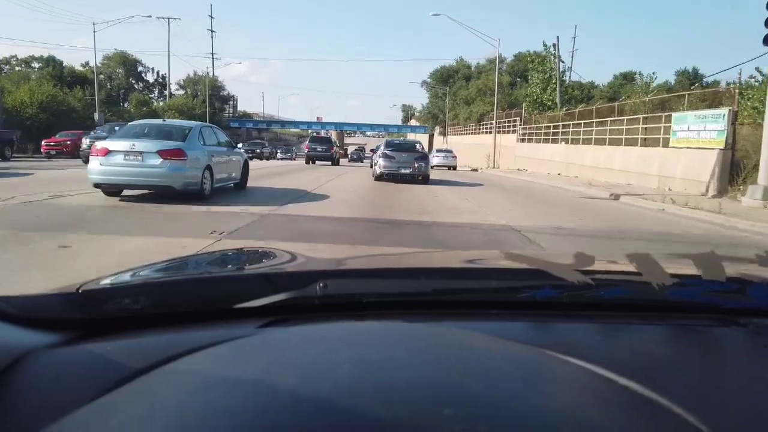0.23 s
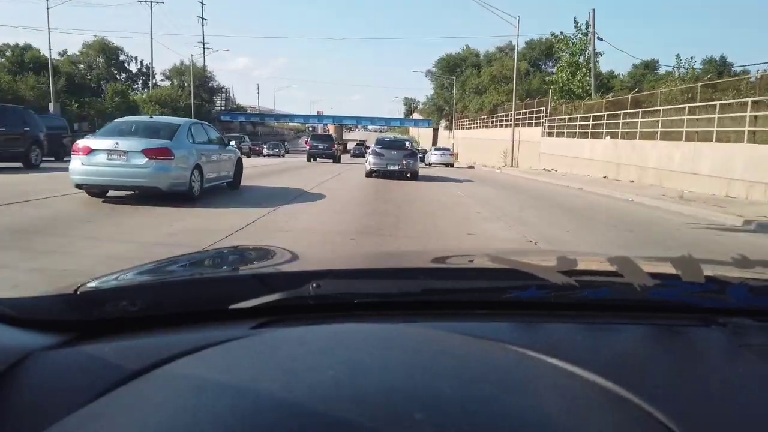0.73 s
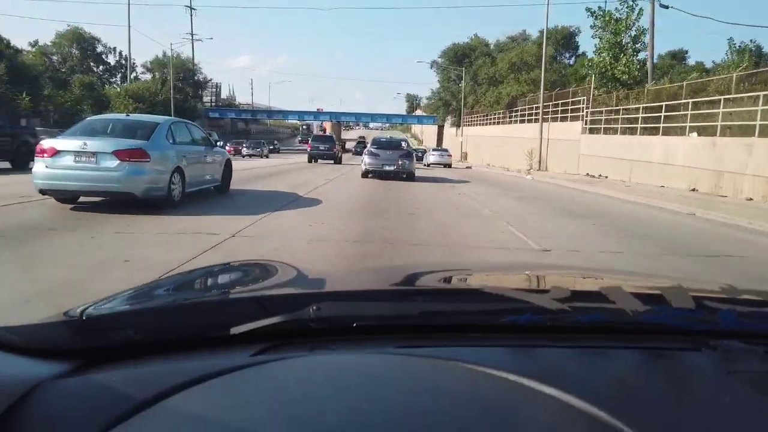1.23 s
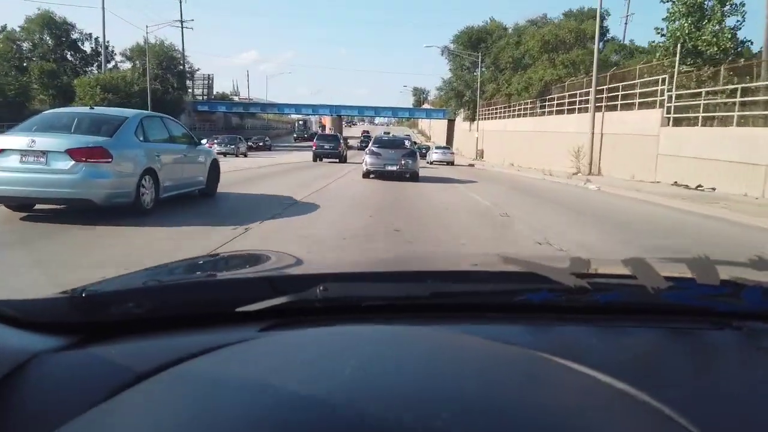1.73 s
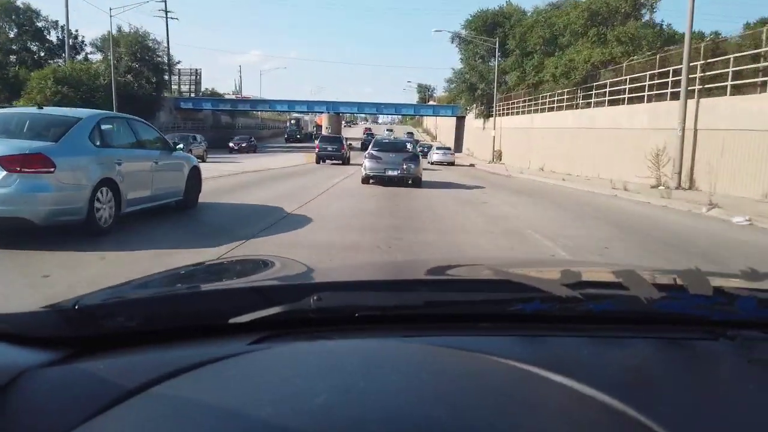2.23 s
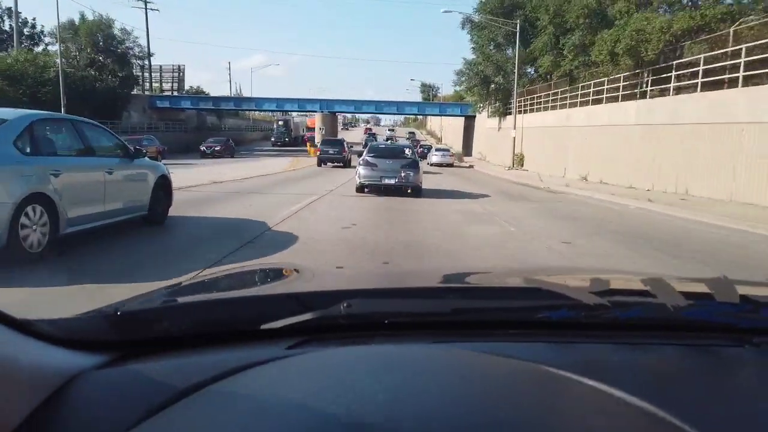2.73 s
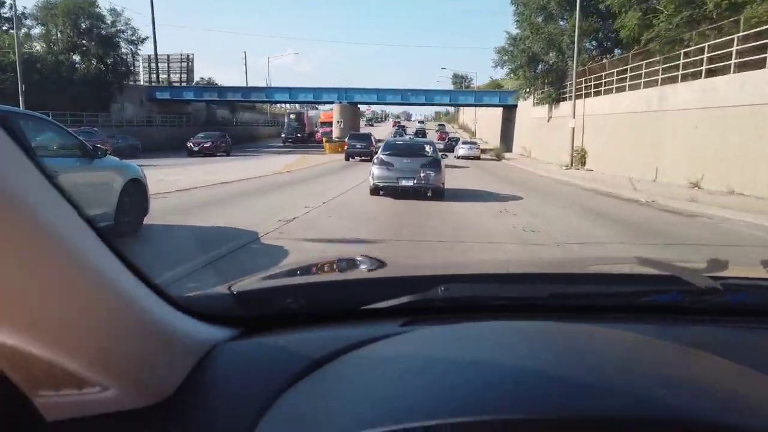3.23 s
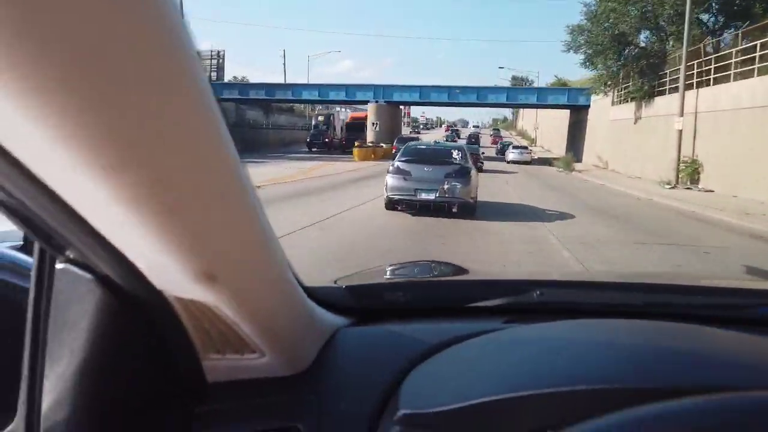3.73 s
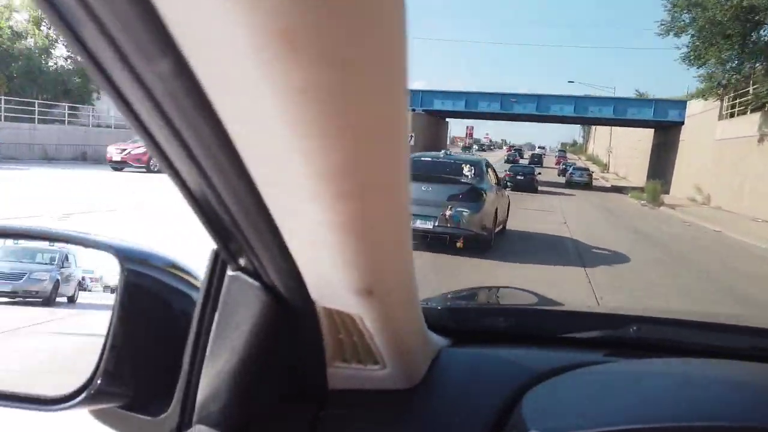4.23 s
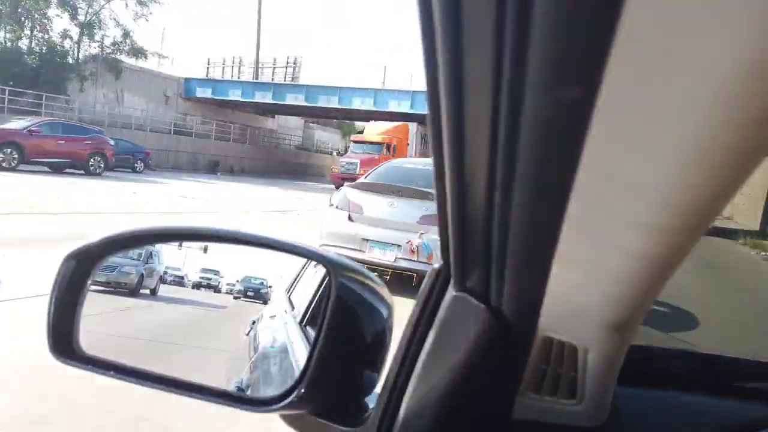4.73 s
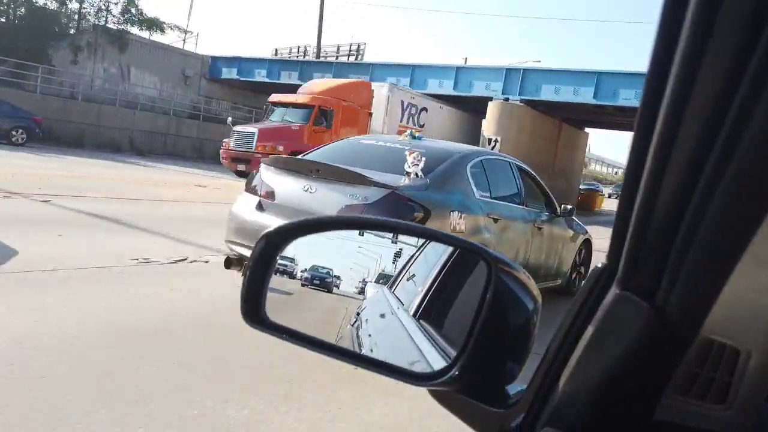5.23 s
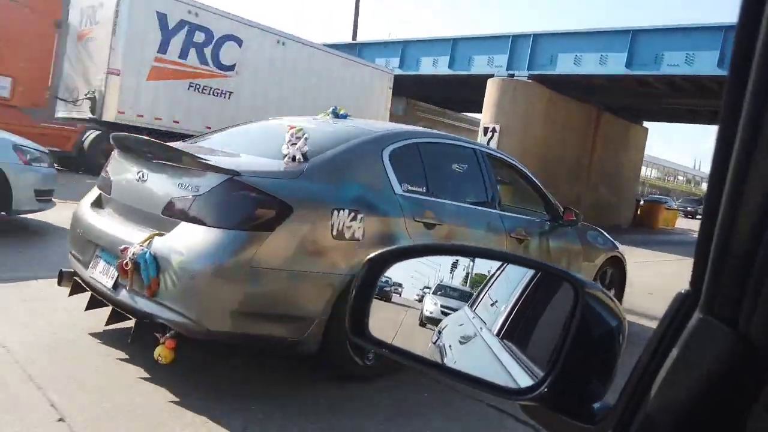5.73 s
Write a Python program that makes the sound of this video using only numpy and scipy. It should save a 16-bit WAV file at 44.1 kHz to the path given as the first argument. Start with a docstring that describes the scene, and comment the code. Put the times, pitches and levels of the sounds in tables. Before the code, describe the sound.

The sound is heard inside a car moving along a concrete highway with a window open. Low rumble, tyre roar and rushing air run throughout, with dull thumps from road joints until about 4 seconds. The car's deep exhaust drone rises slightly in pitch until 1.5 seconds, sinks away, then swells again from 2.8 to 3.5 seconds. Short plastic trim knocks come at about 2.4, 3.9 and 4.7 seconds, the last the loudest. Two faint, high squeals around 4.2 seconds lead into a thin whistle that climbs to the end as window hiss grows. From about 4.3 seconds a second, louder car draws alongside. Its exhaust dips at 5 seconds, then revs up with a rasp from 5.2 to 5.6, with a brief gust of air. It stutters around 5.7 seconds and begins to fall in pitch, still loud.

```python
"""V6 exhaust drone inside a car on a concrete highway, window open: firing harmonics, two throttle pulls.
A second, louder V6 comes alongside, revs once, stutters on one bank and falls back.
Under them: body rumble and boom, jolts at the road joints, tyre roar, rushing air and window hiss.
Plastic trim knocks a few times; two brief squeals lead into a thin rising whistle."""
import sys
import numpy as np
from scipy import signal
from scipy.fft import rfft, irfft
from scipy.io import wavfile
from scipy.ndimage import uniform_filter1d

SR = 44100
rng = np.random.default_rng(int(sys.argv[2]) if len(sys.argv) > 2 else 0)


def bounce(signal):
    """Save signal as a 16-bit WAV file at the path given by the first command-line argument."""
    frames = np.transpose(np.atleast_2d(signal))
    limited = np.clip(frames, -1, 1)
    pcm = np.round(limited * 32767).astype(np.int16)
    wavfile.write(sys.argv[1], SR, pcm)


N = 264600
STEP = 8  # engines have no treble: coarse grid
TIME_S = np.arange(N) / SR
COARSE_S = TIME_S[::STEP]
CYLINDERS = 6
PEDAL_S, RELEASE_S = .06, .09  # own throttle: attack, release

# own engine speed (time [s], firing rate [Hz])
OWN_FIRING_HZ = [(0, 128.1), (.12, 133.8), (.3, 134.7), (.5, 143), (1.42, 150.2), (1.5, 145.5), (1.6, 135),
                 (2.2, 130.9), (2.8, 98), (3.15, 132.4), (3.3, 140.4), (3.49, 142.7), (3.8, 113.5),
                 (6, 105.5)]
# own throttle pulls (down [s], up [s], drone [dB], load [0-1], intake hiss [dB])
THROTTLE_PULLS = [(-.35, 1.482, -13, .95, -61.5), (2.8, 3.544, -14.5, 0.7, -61)]
# own exhaust through the cabin (frequency [Hz], gain [dB])
CABIN_DB = [(30, -16.5), (90, -6), (134, -0.2), (142, 1), (155, -0.5), (210, -8.5), (280, -31),
            (385, -28.5), (406, -22), (422, -32), (445, -29), (545, -31), (580, -30), (720, -43.5),
            (1000, -44), (1500, -57.5)]
# unequal cylinders, own engine: firing harmonic, then the five lines above it (level [dB])
OWN_LINES_DB = [0, -30, -31, -20, -30.5, -28]
# same, other engine (level [dB])
OTHER_LINES_DB = [0, -14.5, -18.5, -18, -24.5, -10.5]
# other engine speed: long coast, one rev (time [s], firing rate [Hz])
OTHER_FIRING_HZ = [(0, 207.1), (2.3, 182.4), (5.02, 156.5), (5.17, 163.1), (5.3, 183.8), (5.6, 248.9),
                   (5.65, 253.4), (5.75, 250.6), (5.82, 238), (6, 231.2)]
# other car coming alongside (time [s], level [dB])
APPROACH_DB = [(0, -32.5), (2.6, -32), (2.8, -25.5), (3.4, -31.5), (4.25, -30.5), (4.55, -20.5),
               (4.8, -17.5), (5.5, -13.5), (6, -11)]
# its pipe, throttle shut (frequency [Hz], gain [dB])
PIPE_SHUT_DB = [(30, -9.5), (95, -7.5), (150, 1.5), (240, -7.5), (315, -20), (420, -15.5), (470, -27.5),
                (520, -31), (640, -36.5), (1000, -43), (1500, -59.5)]
# its pipe, throttle open (frequency [Hz], gain [dB])
PIPE_OPEN_DB = [(30, -13), (100, -12), (175, 1), (250, -3), (370, -5), (490, -13), (560, -18.5),
                (680, -27.5), (750, -17.5), (930, -20), (1100, -24), (1500, -60)]
# one bank firing alone (frequency [x firing rate], level [dB])
ONE_BANK_DB = [(.5, -15), (1.5, -25.5), (2.5, -50)]
# road rumble between joints (time [s], level [dB])
RUMBLE_DB = [(0, -27.5), (2.2, -30.5), (3.3, -24), (5.15, -28), (5.6, -40), (6, -42)]
# concrete joints (time [s], level [dB])
JOINTS_DB = [(.27, -18.5), (1, -23), (1.18, -24), (1.71, -19), (2.23, -26), (2.49, -21), (2.72, -19.5),
             (2.94, -15.5), (3.04, -22), (3.32, -21.5), (3.77, -23)]
# air past the window (time [s], level [dB])
AIR_DB = [(0, -42.5), (.85, -45), (1.4, -44), (2.1, -44), (3.5, -40.5), (4.7, -37), (5.15, -37.5),
          (5.45, -43), (6, -41.5)]
# body cavity notes (frequency [Hz], width [Hz], level [dB])
CAVITY_MODES = [(355, 30, -48), (30, 14, -38)]
# road rumble spectrum (frequency [Hz], relative density [dB])
RUMBLE_SHAPE_DB = [(8, -11.5), (20, 1), (30, 10.5), (45, 2), (60, -8.5), (85, -12.5), (130, -28),
                   (250, -79.5)]
# cabin boom spectrum (frequency [Hz], relative density [dB])
BOOM_SHAPE_DB = [(50, -24), (90, 2), (130, 6), (185, 8.5), (250, -3.5), (310, -3.5), (360, -10),
                 (450, -7.5), (650, -48)]
# tyre roar spectrum (frequency [Hz], relative density [dB])
ROAR_SHAPE_DB = [(200, 9), (350, -3), (450, -1.5), (650, 3.5), (850, 4.5), (1050, 5.5), (1300, -8),
                 (1800, -41)]
# air rush spectrum (frequency [Hz], relative density [dB])
RUSH_SHAPE_DB = [(700, -31), (1100, -0.5), (1400, 1), (1900, -1), (2300, -6), (2800, -8.5), (3200, -17),
                 (3800, -26), (5000, -29.5), (6500, -41), (12000, -53.5)]
# draught spectrum (frequency [Hz], relative density [dB])
DRAUGHT_SHAPE_DB = [(10, -7.5), (35, 2.5), (80, -3), (140, -15), (300, -24), (600, -28), (1200, -48.5)]
# quiet hiss spectrum (frequency [Hz], relative density [dB])
CALM_SHAPE_DB = [(2500, -9.5), (4000, -6), (5200, -4.5), (6500, -7), (7400, -4.5), (8400, 5), (9300, -1),
                 (11000, -14.5), (13200, -2), (14300, -6.5), (15400, -13)]
# loud hiss spectrum (frequency [Hz], relative density [dB])
GUST_SHAPE_DB = [(2500, -3), (4000, -5), (5200, -7), (7300, -2.5), (9000, -2), (11000, -4), (12800, -5),
                 (15400, -7)]
# hiss at the window (time [s], level [dB])
WINDOW_HISS_DB = [(0, -74.5), (2, -68.5), (2.3, -73), (4.05, -68), (4.25, -60), (4.7, -62.5), (5, -57.5),
                  (6, -52)]
# stereo likeness of the noise (frequency [Hz], left-right correlation [0-1])
CORRELATION = [(30, 0.99693), (150, 1), (700, 0.98), (1400, 0.94), (2300, 0.9), (3200, 0.32), (5000, 0.17),
               (8500, 0.36), (13000, 0.13)]
# squeals (time [s], nominal pitch [Hz], width [Hz], peak level [dB])
SQUEAL_EVENTS = [(4.155, 7160, 260, -46), (4.285, 7100, 600, -56)]
# rising whistle (time [s], nominal pitch [Hz], width [Hz], level [dB])
WHISTLE_GLIDE = [(4.3, 7450, 899, -67), (4.5, 7800, 848, -59), (5, 8140, 847, -54.5),
                 (5.4, 9000, 453, -51.5), (5.62, 9450, 283, -46.5), (5.78, 9570, 201, -49.5),
                 (6, 9660, 200, -58)]
# cabin knocks (time [s], level [dB], pitch [Hz], t60 [s])
KNOCK_EVENTS = [(2.405, -21.5, 947, 0.047), (2.411, -21.5, 984, 0.039), (3.45, -48, 5200, .04),
                (3.932, -17.5, 1141, 0.019), (4.652, -11.5, 835, 0.033), (4.707, -21.5, 745, 0.073)]
# trim modes (frequency [x pitch], level [dB])
TRIM_MODES = [(1, -1.5), (1.17, -12.5), (1.9, -26)]


def own_car():
    """Exhaust drone boosted by the cabin; load adds burble and overtones."""
    swell_s, overrun_s, overrun_db = .22, .45, -10.5
    firing_hz, = curves(OWN_FIRING_HZ, COARSE_S)
    load = own_load(COARSE_S)
    drive = 0
    for on, off, db, _, _ in THROTTLE_PULLS:
        pull = gate(on, off, swell_s, RELEASE_S)
        overrun = amp(overrun_db) * gate(on, off, swell_s, overrun_s)  # hum after lift-off
        drive += amp(db) * np.maximum(pull, overrun)
    firings = np.cumsum(firing_hz) * STEP / SR + .012 * wander(23)
    overtone_db = 9 * (load - .52) + 1.5 * wander(10)

    def pipe_db(hz):
        return colour(CABIN_DB, hz) + overtone_db * ramp(hz, 170, 100)

    note = exhaust(firings, firing_hz, pipe_db, OWN_LINES_DB, uneven_db=7 * load, ragged_db=16,
                   rough_rad=.83, flutter=.045, waver_db=2.5, line_limit=50)
    return ports(upsample(drive * note), lag_ms=.018)


def own_load(t):
    """Engine load, 0-1: follows the pedal, eases as the car gathers speed."""
    ease_s = 1.4
    return sum(load * gate(on, off, PEDAL_S, RELEASE_S, t) * np.exp(-np.maximum(t - on, 0) / ease_s)
               for on, off, _, load, _ in THROTTLE_PULLS)


def exhaust(firings, firing_hz, pipe_db, lines_db, uneven_db, ragged_db, rough_rad, flutter,
            waver_db, line_limit):
    """Six-cylinder cycle harmonics through a pipe; cylinders differ more higher up."""
    out = 0
    for k in range(1, line_limit):
        line_hz = firing_hz * k / CYLINDERS
        phase = 2 * np.pi * firings * k / CYLINDERS
        level_db = pipe_db(line_hz)
        if k % CYLINDERS:  # between firing harmonics
            level_db += lines_db[k % CYLINDERS] + uneven_db + ragged_db * ramp(line_hz, 300, 600)
            phase += 2 * np.pi * rng.random() + rough_rad * wander(11)
        elif k > CYLINDERS:  # firing overtones
            level_db += waver_db * wander(7)
        out += amp(level_db) * np.cos(phase)
    return np.sqrt(2) * out * (1 + flutter * wander(41))


def other_car():
    """Open exhaust: mellow coasting, rasping on throttle, an octave lower on misfire."""
    switch_s, lift_db, misfire_db = .0077, -11, -5.5
    rasp_end_s, rasp_fade_db_per_s, rasp_hz = 5.506, 65, 620  # rasp dies as revs level off
    firing_hz, = curves(OTHER_FIRING_HZ, COARSE_S)
    lift = gate(5.012, 5.174, switch_s, switch_s)
    throttle = gate(5.203, 5.757, attack_s=.031, release_s=.012)
    misfire = gate(5.648, 5.752, switch_s, switch_s)
    level_db = curves(APPROACH_DB, COARSE_S)[0] + lift_db * lift + misfire_db * misfire
    rasp_db = -rasp_fade_db_per_s * np.maximum(COARSE_S - rasp_end_s, 0)
    firings = np.cumsum(firing_hz) * STEP / SR + .007 * wander(50)

    def pipe_db(hz):
        open_db = colour(PIPE_OPEN_DB, hz) + rasp_db * ramp(hz, rasp_hz, 100)
        return (1 - throttle) * colour(PIPE_SHUT_DB, hz) + throttle * open_db

    note = exhaust(firings, firing_hz, pipe_db, OTHER_LINES_DB, uneven_db=-4.5 * throttle,
                   ragged_db=12, rough_rad=.6, flutter=.11, waver_db=1.2, line_limit=44)
    tones = amp(level_db) * note + misfire * one_bank(firings)
    puffs = gas_puffs(firings, gain=amp(level_db + rasp_db - 21) * throttle ** 2)
    return ports(upsample(tones), lag_ms=.03) + puffs


def gas_puffs(firings, gain):
    """One puff of turbulent gas per firing."""
    pulses = unit(np.exp(.98 * np.cos(2 * np.pi * firings)))
    # (frequency [Hz], relative density [dB])
    shape_db = [(200, -20), (400, 2), (650, 9), (950, -12), (1200, -12), (1700, -21), (3000, -41)]
    return upsample(gain * pulses) * noise(shape_db, patchy_db=2)


def one_bank(firings):
    """One bank firing alone: odd multiples of half the firing rate."""
    lines = sum(amp(db) * np.sin(2 * np.pi * ratio * firings) for ratio, db in ONE_BANK_DB)
    return np.sqrt(2) * lines * (1 + .39 * np.cos(2 * np.pi * firings / CYLINDERS))


def road_rumble():
    """Body rumble over concrete, jolted at each joint."""
    hold_s = .056
    jolts = sum(amp(db) * gate(s, s + hold_s, attack_s=.016, release_s=.04, t=TIME_S)
                for s, db in JOINTS_DB)
    rolling = amp(curves(RUMBLE_DB)[0])
    return np.hypot(rolling, jolts) * noise(RUMBLE_SHAPE_DB, patchy_db=.5)


def boom_tyres_air():
    """Cabin boom and tyre roar follow the air rush; boom also grows with load."""
    air_db, = curves(AIR_DB)
    mean_db = air_db.mean()
    swell_db = air_db - mean_db
    boom_db = mean_db + 8.5 + .77 * swell_db + 4 * own_load(TIME_S)
    roar_db = mean_db + 3.5 + 1.27 * swell_db
    boom = amp(boom_db) * noise(BOOM_SHAPE_DB, patchy_db=1.5)
    roar = amp(roar_db) * noise(ROAR_SHAPE_DB, patchy_db=2.1)
    rush = amp(air_db) * noise(RUSH_SHAPE_DB, patchy_db=1.04)
    return boom + roar + rush


def cavity_hum():
    """Body cavity notes: narrow noise bands at fixed pitch."""
    hum = 0
    for hz, width_hz, db in CAVITY_MODES:
        phase = 2 * np.pi * hz * COARSE_S
        hum += amp(db) * (wander(width_hz / 2) * np.cos(phase) + wander(width_hz / 2) * np.sin(phase))
    return upsample(hum)


def draught():
    """Draughts brush each microphone port separately, swelling as it turns to the window."""
    level_db = -52 + 9.5 * swell(at_s=3.2, width_s=.32)
    return amp(level_db) * np.array([noise(DRAUGHT_SHAPE_DB, patchy_db=3.5)[0] for port in "LR"])


def hiss():
    """Window, intake and one gust; the spectrum flattens as the level rises."""
    intake_hold_s = .69
    intake = 0
    for on, off, _, _, db in THROTTLE_PULLS:
        early = gate(on, on + intake_hold_s, attack_s=.22, release_s=.6, t=TIME_S)
        intake += amp(db) * early * gate(on, off, PEDAL_S, RELEASE_S, TIME_S)
    window = amp(curves(WINDOW_HISS_DB)[0])
    gust = amp(-46.5) * swell(at_s=5.565, width_s=.086)
    level_db = 10 * np.log10(window ** 2 + intake ** 2 + gust ** 2)
    blend = ramp(level_db, -63, 8)
    calm = np.sqrt(1 - blend) * noise(CALM_SHAPE_DB, patchy_db=3.5)
    broad = np.sqrt(blend) * noise(GUST_SHAPE_DB, patchy_db=1.7)
    return amp(level_db + 4.5) * (calm + broad)


def whistles():
    """Two brief squeals, then a thin whistle that climbs and narrows."""
    slope_db_per_s = 260
    squeals = 0
    for s, hz, width_hz, db in SQUEAL_EVENTS:
        squeals += amp(db - slope_db_per_s * abs(TIME_S - s)) * resonance(hz, width_hz, octave_db=-24)
    hz, width_hz, level_db = curves(WHISTLE_GLIDE)
    started = TIME_S > WHISTLE_GLIDE[0][0]
    return squeals + amp(level_db) * started * resonance(hz, width_hz, octave_db=-61)


def resonance(hz, width_hz, octave_db):
    """Narrow stereo noise just below hz, plus a faint octave; wider flickers faster."""
    phase = 2 * np.pi * np.cumsum(hz * np.ones(N)) / SR
    position = np.cumsum(width_hz * np.ones(N)) / SR
    knots = int(position[-1]) + 2

    def drift():
        smooth = signal.resample(rng.standard_normal(knots), knots * 8)
        return unit(np.interp(position, np.arange(knots * 8) / 8, smooth))

    def band(ratio):
        return unit(drift() * np.cos(ratio * phase) + drift() * np.sin(ratio * phase))

    centre = band(.98)
    sides = np.array([band(.96), band(.96)])
    return unit(centre + .96 * sides) + amp(octave_db) * band(2)


def knocks():
    """Short damped rings of plastic trim."""
    attack_s = .00077
    out = np.zeros(N)
    for s, db, hz, t60_s in KNOCK_EVENTS:
        age_s = np.clip(TIME_S - s, 0, 1)
        envelope = amp(db - 60 * age_s / t60_s) * (1 - np.exp(-age_s / attack_s))
        ring = sum(amp(mode_db) * np.sin(2 * np.pi * hz * k * age_s) for k, mode_db in TRIM_MODES)
        out += envelope * ring
    return out


def noise(shape_db, patchy_db):
    """Turbulent stereo noise, rms 1, with drifting spectral patches."""
    hz = np.fft.rfftfreq(2048, 1 / SR)
    grid = (N // 512 + 5, len(hz))  # frames, bins
    patches = uniform_filter1d(rng.standard_normal(grid), size=6, axis=0)
    patches = unit(uniform_filter1d(patches, size=20, axis=1))
    mid, side = rng.standard_normal((2, *grid)) + 1j * rng.standard_normal((2, *grid))
    correlation = colour(CORRELATION, hz)
    mid *= np.sqrt(1 + correlation)
    side *= np.sqrt(1 - correlation)
    spectra = np.array([mid + side, mid - side]) * amp(colour(shape_db, hz) + patchy_db * patches)
    _, stereo = signal.istft(spectra.swapaxes(1, 2), nperseg=2048, noverlap=1536)
    return unit(stereo[:, :N])


def wander(rate_hz):
    """Slow random motion, rms about 1, coarse grid."""
    hz = np.fft.rfftfreq(4096, TIME_S[-1] / 4096)
    slow = irfft(rfft(rng.standard_normal(4096)) / (1 + (hz / rate_hz) ** 4))
    return np.interp(COARSE_S, np.linspace(0, TIME_S[-1], len(slow)), unit(slow))


def ports(x, lag_ms):
    """Two close microphone ports; left leads."""
    return np.array([x, np.interp(TIME_S - lag_ms / 1000, TIME_S, x)])


def gate(on_s, off_s, attack_s, release_s, t=COARSE_S):
    """Exponential rise from on_s, decay from off_s."""
    rise = 1 - np.exp(-np.clip(t - on_s, 0, off_s - on_s) / attack_s)
    return rise * np.exp(-np.maximum(t - off_s, 0) / release_s)


def swell(at_s, width_s):
    """Gaussian bump."""
    return np.exp(-.5 * ((TIME_S - at_s) / width_s) ** 2)


def ramp(x, start, span):
    """Linear 0 to 1, clipped."""
    return np.clip((x - start) / span, 0, 1)


def curves(rows, t=TIME_S):
    """Table columns, linear in time."""
    times_s, *columns = np.transpose(rows)
    return [np.interp(t, times_s, column) for column in columns]


def colour(points, hz):
    """Table value on a log-frequency axis."""
    points_hz, values = np.transpose(points)
    return np.interp(np.log(hz + 1), np.log(points_hz), values)


def upsample(x):
    """Coarse grid to full rate."""
    return signal.resample_poly(x, STEP, 1, window=("kaiser", 10))[:N]


def amp(db):
    """dB to gain."""
    return 10 ** (np.asarray(db) / 20)


def unit(x):
    """Scale to rms 1."""
    return x / np.sqrt(np.mean(x ** 2) + 1e-20)


def scene():
    """Mix at the driver's seat."""
    engines = own_car() + other_car()
    road = road_rumble() + boom_tyres_air() + cavity_hum() + draught()
    return engines + road + hiss() + whistles() + knocks()


def record(dry):
    """Short end fades, then low-pass."""
    cutoff_hz = 15500
    faded = dry * signal.windows.tukey(N, .002)
    lowpass = signal.firwin(511, cutoff_hz, window=("kaiser", 9), fs=SR)
    return signal.oaconvolve(faded, lowpass[None], "same", axes=1)


dry = scene()
out = record(dry)
bounce(out)
```